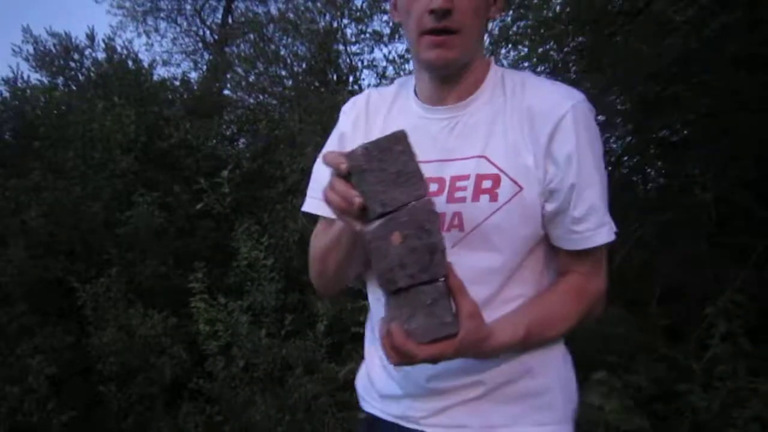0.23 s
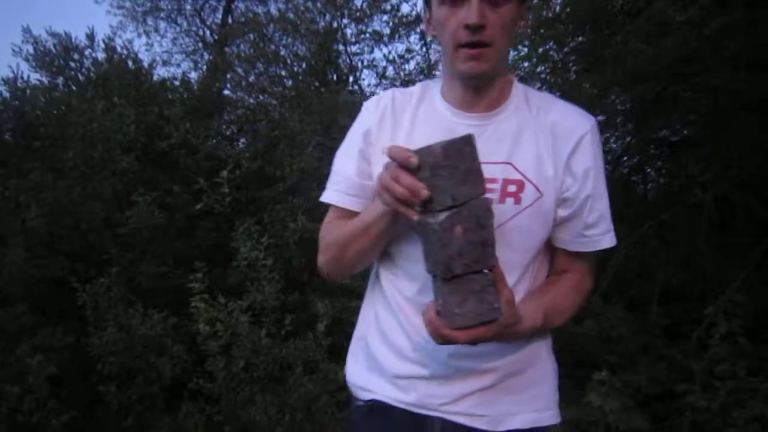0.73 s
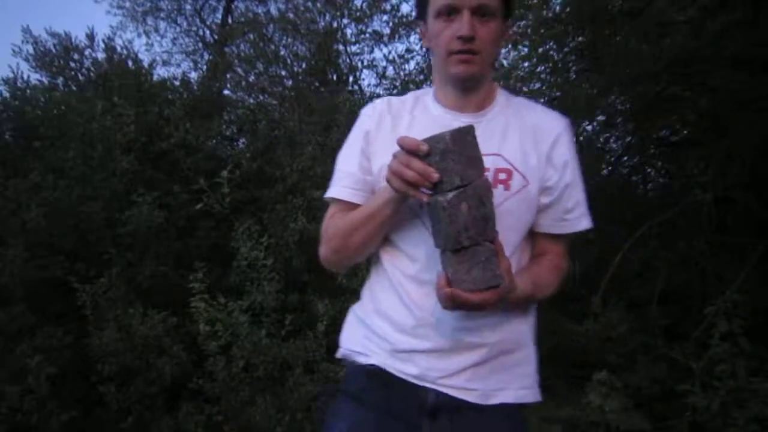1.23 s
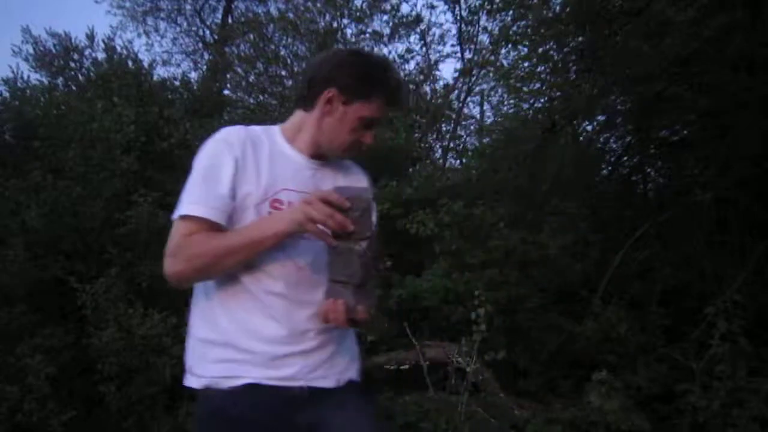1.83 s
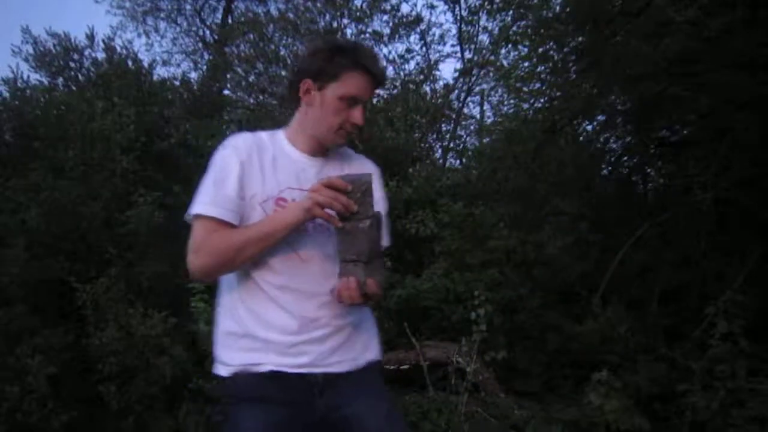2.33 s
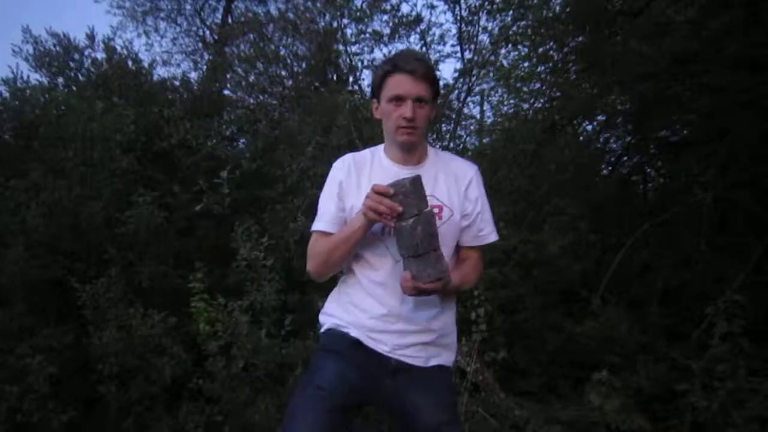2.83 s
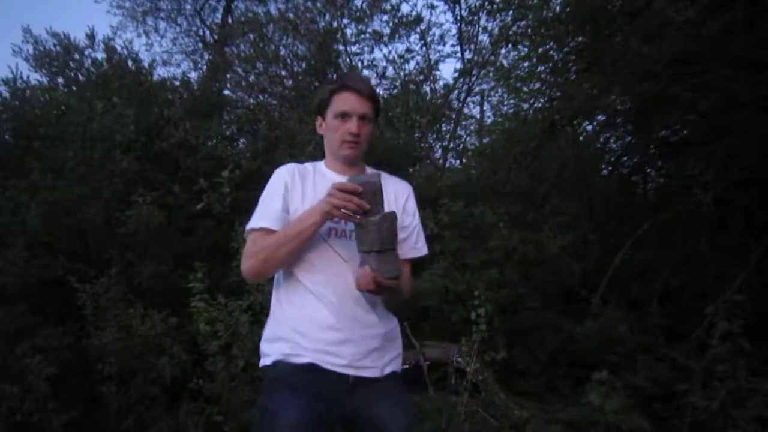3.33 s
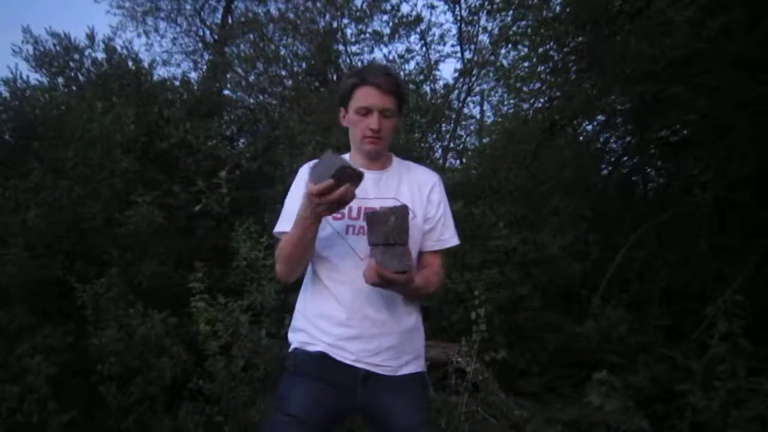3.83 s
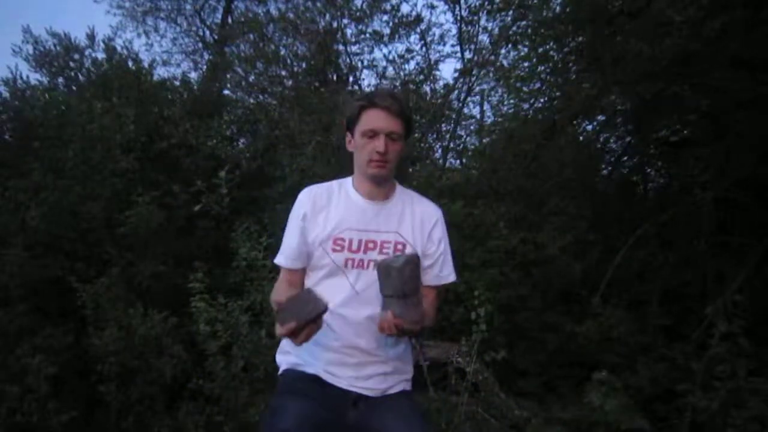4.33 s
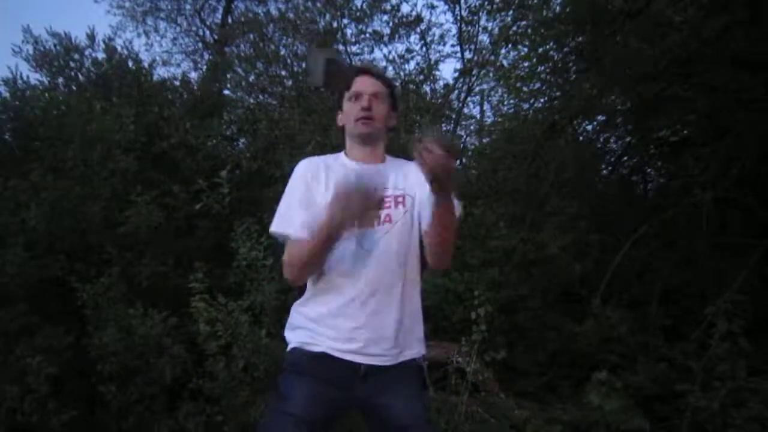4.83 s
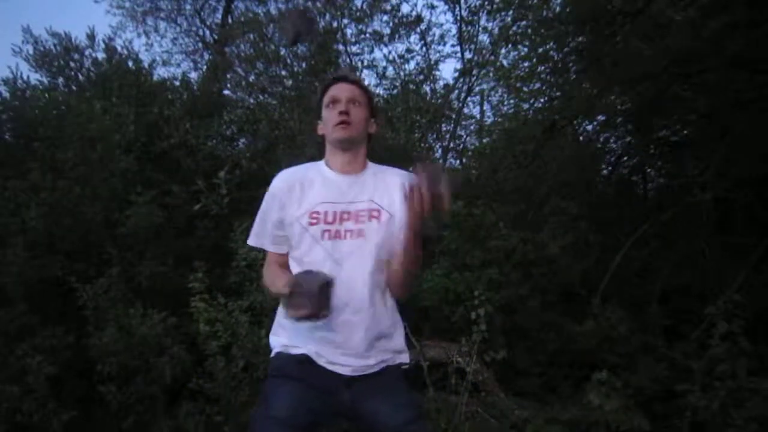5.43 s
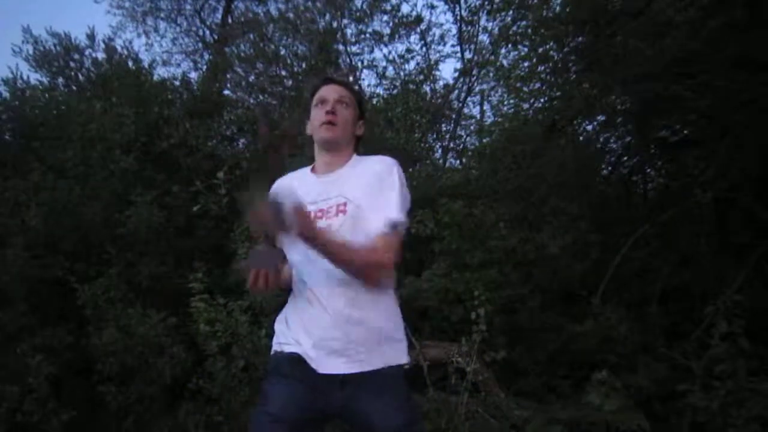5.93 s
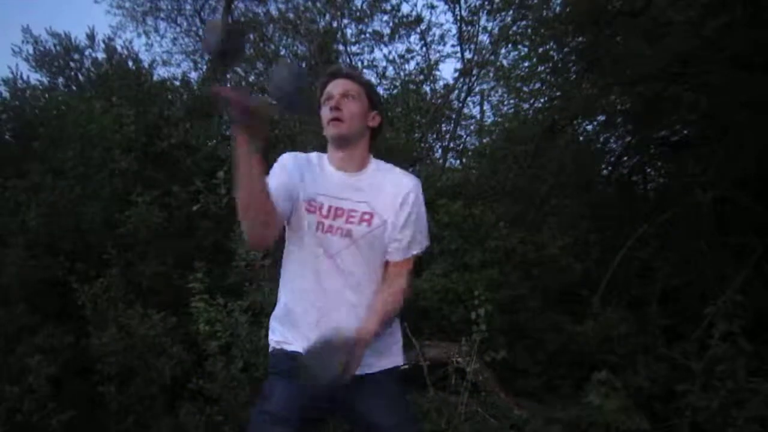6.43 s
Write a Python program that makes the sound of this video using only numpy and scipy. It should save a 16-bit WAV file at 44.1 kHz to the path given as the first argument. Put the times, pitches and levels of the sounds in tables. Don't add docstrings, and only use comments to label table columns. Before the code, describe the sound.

A dusk thicket with low, steady far-traffic rumble, faint engine swells and soft air hiss, heard through a small microphone with restrained treble. Close leaves rustle and stones tick irregularly, busiest from 0 to 3.4 s, with sharp clicks near 1.36, 1.56 and 3.08. A nightingale gives thin dipping calls with quick flicks at 0.2, 0.8 and 1.45, and pulsing clear whistles at 0.43 and 1.06. Falling swoops at 1.7 and 2.4 each lead to a rising note and two double clacks. A low pipe climbs at 3.2. Seven bright pairs of falling chirps repeat from 3.5 to 5.0, most followed by a faint murmur; a distant whistle hides at 3.7. A short rising buzz at 5.06 launches fifteen crisp rattle strokes, 5.16 to 6.43, with a soft thump at 5.22. A longer falling chirp at 6.52, a low pipe and small ticks finish. Trees add diffuse echoes.

```python
import sys
import numpy as np
from scipy import signal
from scipy.fft import rfft, irfft
from scipy.io import wavfile
from scipy.ndimage import uniform_filter1d, map_coordinates

SR = 44100
rng = np.random.default_rng(int(sys.argv[2]) if len(sys.argv) > 2 else 0)


def to_linear_factor(level_db):
    exponent = np.asarray(level_db, float) / 20
    return 10 ** exponent


def dump_mix(stems):
    frames = np.atleast_2d(stems).T
    limited = np.clip(frames, -1, 1)
    pcm = np.round(limited * 32767).astype(np.int16)
    wavfile.write(sys.argv[1], SR, pcm)


N = 295470


def rms_one(x):
    return x / np.sqrt(np.mean(x ** 2) + 1e-20)


def at_hz(points, hz):
    table_hz, table_db = np.transpose(points)
    return np.interp(np.log(hz), np.log(table_hz), table_db)


def drift(rate_hz):
    r = np.exp(-2 * np.pi * rate_hz / SR)
    settled = signal.lfilter([1], [1, -2 * r, r * r], rng.standard_normal(N + SR))[SR:]
    return rms_one(settled)


def coloured(x, spectrum):
    hz = np.maximum(np.arange(N // 2 + 1) * SR / N, 1)
    return rms_one(irfft(rfft(x) * to_linear_factor(at_hz(spectrum, hz)), N))


def resonance(x, hz, width_hz):
    r = np.exp(-np.pi * width_hz / SR)
    top = np.array([1, 0, -1]) * (1 - r * r) / 2
    return signal.lfilter(top, [1, -2 * r * np.cos(2 * np.pi * hz / SR), r * r], x)


def resonance_twice(x, hz, width_hz):
    return resonance(resonance(x, hz, width_hz), hz, width_hz)


# frequency in Hz, level in dB per Hz.
AIR_SPECTRUM = [(20, -25), (32, -4.5), (45, 2), (105, -3), (170, -9), (900, -12), (1900, -27.5),
                (4250, -35), (7000, -38.5), (9000, -48), (10500, -44), (13000, -47.5), (16000, -48.5)]
# pitch in Hz, width in Hz, level in dB, loudest at in seconds, half length in seconds.
ENGINE_DRONES = [
    (47, 10, -48, 3.3, 9.0),
    (105, 14, -50, 2.3, .5),
    (112, 12, -50, 4.2, .3),
    (122, 14, -52, 5.6, .8),
    (243, 8, -55, 5.65, .2),
]


def far_traffic():
    air_db = -40.5 + 0.4 * drift(1.5)
    out = to_linear_factor(air_db) * coloured(rng.standard_normal(N), AIR_SPECTRUM)
    t = np.arange(N) / SR
    for hz, width_hz, db, loudest_s, half_s in ENGINE_DRONES:
        swell = to_linear_factor(db) * np.exp(-((t - loudest_s) / half_s) ** 2)
        out += swell * rms_one(resonance_twice(rng.standard_normal(N), hz, width_hz))
    return out


# start in seconds, peak in dB, brightness in dB.
TICK_EVENTS = [(0.036, -34.5, -5), (0.554, -33, -9), (0.7369, -32, 0.5), (1.3364, -42, -10.5),
               (1.357, -24.5, -6), (1.4266, -29, -10.5), (1.5644, -19, -19), (1.653, -42, -8),
               (1.6906, -27, -8), (2.439, -32, -18), (2.6152, -43, 0.1), (3.0755, -40, -30),
               (3.082, -17, 1.5), (3.1155, -26, -20), (3.2445, -26, -28), (3.251, -39, -9),
               (4.276, -40, -22), (4.2923, -25.5, -9), (4.313, -30, -22), (4.3845, -36, 2),
               (5.432, -30, -6), (6.575, -44, -30), (6.617, -37, -13), (6.668, -30, -18), (6.688, -37, -12)]


def ticks():
    out, t = np.zeros(N), np.arange(300) / SR
    bright = signal.butter(2, [8500, 15500], "band", fs=SR, output="sos")
    dull = signal.butter(2, [350, 7400], "band", fs=SR, output="sos")
    for s, low_db, bright_db in TICK_EVENTS:
        snap = rng.standard_normal(300) * np.exp(-t / 0.0008)
        for db, band in [(low_db + bright_db - 3, bright), (low_db + 2.5, dull)]:
            part = signal.sosfilt(band, snap)
            out[round(s * SR):][:300] += to_linear_factor(db) * part / np.abs(part).max()
    return out


# frequency in Hz, level in dB per Hz.
LEAF_SPECTRUM = [(880, -54), (1500, -15), (1810, -14.5), (2450, -17), (6020, -17.5), (7960, -30),
                 (13300, -37), (16400, -46)]
# centre in seconds, half length in seconds, level in dB, brightness in dB.
RUSTLE_SWELLS = [(0.055, .06, -51, -22), (0.143, 0.022, -47.5, -24), (0.493, 0.12, -59, 0),
                 (0.545, 0.037, -45.5, -19), (0.907, 0.093, -58, -3.5), (1.348, 0.029, -44, -4),
                 (1.433, 0.089, -54, -3.5), (1.587, 0.041, -65, 9), (1.65, 0.045, -52, -13),
                 (2.634, 0.32, -54, -10.5), (3.03, 0.043, -48.5, -8), (3.103, 0.028, -45, -3.5),
                 (3.235, 0.073, -55, -12), (3.388, 0.029, -43.5, -7), (3.716, 0.081, -56, -27),
                 (4.32, 0.015, -55, -9), (6.655, 0.072, -64, -24)]


def undergrowth():
    grains_per_s, unevenness_db, split_hz = 12000, 3.2, 7880
    sizes = to_linear_factor(unevenness_db * np.minimum(rng.exponential(1, N), 5)) * rng.choice([-1, 1], N)
    grains = coloured(sizes * (rng.random(N) < grains_per_s / SR), LEAF_SPECTRUM)
    t, out = np.arange(N) / SR, np.zeros(N)
    for kind in ["high", "low"]:
        split = signal.butter(4, split_hz, kind, fs=SR, output="sos")
        band = rms_one(signal.sosfilt(split, grains))
        power = np.zeros(N)
        for s, half_s, db, bright_db in RUSTLE_SWELLS:
            band_db = db + bright_db * (kind == "high")
            power += to_linear_factor(band_db) ** 2 * np.exp(-((t - s) / half_s) ** 2)
        out += np.sqrt(power) * band
    return to_linear_factor(2.0 * drift(32)) * out


# multiple of the pitch, level in dB.
PURE_OVERTONES = [(2, -36), (3, -36), (4, -54)]
# frequency in Hz, gain in dB.
NARROW_BEAK = [(2500, 12), (6000, 0.5), (8500, -5.5), (9100, -6), (10600, 4), (12500, -1.5), (16000, -29)]


def narrow_beak(turn, pitch_hz, effort_db, overtone_db):
    growth, full_effort_db = 0.32, -37.5
    push_db = overtone_db + growth * (effort_db - full_effort_db)
    tone = np.sin(turn)
    for k, db in PURE_OVERTONES:
        gain = to_linear_factor(db + push_db + at_hz(NARROW_BEAK, k * pitch_hz))
        tone = tone + gain * np.sin(k * turn) * (k * pitch_hz < 18000)
    return tone


# frequency in Hz, gain in dB.
WIDE_THROAT = [(1200, -63), (2400, -4), (4000, -1), (6300, 9), (7600, -1), (10500, -22), (12500, -6),
               (16000, -35)]


def wide_beak(turn, pitch_hz):
    tone = 0
    for k in range(1, 19):
        gain = to_linear_factor(at_hz(WIDE_THROAT, k * pitch_hz)) * (k * pitch_hz < 18000)
        tone = tone + gain * np.sin(k * turn + k * k)
    return tone


def add_note(out, rows, overtone_db, wobble):
    s, hz, level_db = np.transpose(rows)
    n = np.arange(round(s[0] * SR), min(round(s[-1] * SR), N))
    t = n / SR
    rounding = min(len(n) // 14, round(0.0045 * SR))
    pitch_hz = uniform_filter1d(np.interp(t, s, hz), size=rounding, mode="nearest") * (1 + wobble[n])
    turn = 2 * np.pi * np.cumsum(pitch_hz) / SR
    effort_db = np.interp(t, s, level_db)
    if overtone_db is None:
        jitter_rad = 0.16 * drift(300)[n]
        tone = wide_beak(turn + jitter_rad, pitch_hz)
    else:
        tone = narrow_beak(turn, pitch_hz, effort_db, overtone_db)
    edge = np.clip(np.minimum(t - t[0], t[-1] - t) / 0.0015, 0, 1)
    out[n] += np.sqrt(2) * to_linear_factor(effort_db) * edge * tone


def sing(out, shape, times, overtone_db, wobble):
    for s, db, ratio in times:
        rows = np.array(shape) * [1 / 1000, ratio, 1] + [s, 0, db]
        add_note(out, rows, overtone_db, wobble)


def breath(ms, db, attack_ms, release_ms, sag_db):
    end_ms, held_db = ms[-1], db - sag_db
    return np.interp(ms, [0, attack_ms, end_ms - release_ms, end_ms], [db - 17, db, held_db, held_db - 12.5])


def glide(length_ms, from_hz, to_hz, **level):
    ms = np.linspace(0, length_ms, 40)
    return np.transpose([ms, np.interp(ms, [0, length_ms], [from_hz, to_hz]), breath(ms, **level)])


# time in ms, pitch in Hz, level in dB rms.
SEEP_SHAPE = [(0, 7200, -46), (8, 6950, -31.5), (19.5, 6600, -24), (31.4, 6850, -26), (36.5, 7500, -32.5),
              (46, 8060, -41.5)]
# start in seconds, seep change in dB, flick change in dB, pitch ratio.
HIGH_CALLS = [
    (0.177, -10.5, -10.5, 1.04),
    (.810, 0, 1.5, 1.03),
    (1.453, 2, 8.5, 1.0),
]


def high_calls(out, wobble):
    flick = glide(7.3, 7440, 4230, db=-22.5, attack_ms=4, release_ms=3.5, sag_db=4.5)
    for s, seep_db, flick_db, ratio in HIGH_CALLS:
        sing(out, SEEP_SHAPE, [(s, seep_db, ratio)], -3, wobble)
        sing(out, flick, [(s + 0.0499, flick_db, ratio)], 3, wobble)


# final pitch in Hz, starts lower by Hz, climb time in seconds, creep in Hz per s.
WHISTLE_PITCHES = [
    (4495, 730, .036, 30),
    (4190, 700, .024, 560),
]
# time in seconds, level in dB rms.
WHISTLE_BREATHS = [
    [(0.425, -43), (0.445, -26.5), (0.491, -22.5), (0.535, -39.5), (0.587, -19), (0.634, -19.5),
     (0.648, -42)],
    [(1.058, -38), (1.072, -27.5), (1.108, -20), (1.166, -37.5), (1.258, -17), (1.284, -18), (1.302, -60)],
]


def whistles(out, wobble):
    for (final_hz, lower_hz, climb_s, creep), swells in zip(WHISTLE_PITCHES, WHISTLE_BREATHS):
        s, db = np.transpose(swells)
        t = np.linspace(0, s[-1] - s[0], 120)
        droop_hz = 90 * np.exp((t - t[-1]) / 0.008)
        hz = final_hz - lower_hz * np.exp(-t / climb_s) + creep * t - droop_hz
        rows = np.transpose([s[0] + t, hz, np.interp(s[0] + t, s, db)])
        add_note(out, rows, -4, wobble)


# time in ms, pitch in Hz, level in dB rms.
SWOOP_SHAPE = [(0, 2725, -44.5), (13.8, 2600, -19), (41.9, 1975, -19.5), (64.6, 1890, -30)]
# start in seconds, change in dB, pitch ratio.
SWOOP_TIMES = [
    (1.690, 0, 0.99),
    (2.378, 0.83, 1.0),
]


def swoops(out, wobble):
    sing(out, SWOOP_SHAPE, SWOOP_TIMES, -6.5, wobble)


# start in seconds, change in dB, pitch ratio.
RISE_TIMES = [
    (1.867, 0.0091, 0.98),
    (2.572, 0.012, 0.98),
]


def rises(out, wobble):
    start_hz, creep_hz_per_ms, race_hz, race_ms = 2381, 3.5, 848, 30
    break_ms, jump_hz, top_hz_per_ms = 163, 321, 17
    ms = np.linspace(0, 189.4, 120)
    below = np.minimum(ms, break_ms)
    hz = start_hz + creep_hz_per_ms * below + race_hz * np.exp((below - break_ms) / race_ms)
    hz = hz + jump_hz * (ms > break_ms) + top_hz_per_ms * (ms - below)
    dip_db = 2.5 * np.exp(-((ms - break_ms) / 21) ** 2)
    level_db = breath(ms, db=-17.5, attack_ms=44.5, release_ms=12.5, sag_db=0.3) - dip_db
    sing(out, np.transpose([ms, hz, level_db]), RISE_TIMES, -4, wobble)


# start in seconds, peak in dB, ring in Hz.
CLACK_EVENTS = [
    (2.189, -18, 5500),
    (2.1949, -20, 4060),
    (2.216, -21.5, 4720),
    (2.2224, -13.5, 4900),
    (2.9247, -21.5, 4450),
    (2.93, -22, 5470),
    (2.9516, -17, 5600),
    (2.957, -16, 4600),
]


def clacks():
    out, t = np.zeros(N), np.arange(400) / SR
    for s, db, hz in CLACK_EVENTS:
        burst = rng.standard_normal(400) * np.exp(-t / 0.0011)
        ring = resonance_twice(burst, hz, 2200) + to_linear_factor(-21) * resonance_twice(burst, 10800, 2500)
        out[round(s * SR):][:400] += to_linear_factor(db - 1.5) * ring / np.abs(ring).max()
    return out


# start in seconds, change in dB, pitch ratio.
PEEP_TIMES = [(3.125, 0, 1.0)]


def peep(out, wobble):
    shape = glide(35, 2780, 2900, db=-60, attack_ms=10, release_ms=15, sag_db=1.5)
    sing(out, shape, PEEP_TIMES, 0, wobble)


# time in seconds, pitch in Hz, level in dB rms.
PIPE_NOTES = [
    [(3.165, 1220, -38.5), (3.187, 1365, -42), (3.207, 1056, -53), (3.225, 1110, -41)],
    [(3.226, 1068, -48), (3.252, 1730, -26.5), (3.264, 1840, -24), (3.288, 1840, -22), (3.301, 1850, -27),
     (3.306, 1760, -32), (3.311, 1800, -26), (3.317, 1800, -35)],
    [(6.635, 1550, -49), (6.645, 1647, -37), (6.661, 1542, -30.5), (6.7, 1470, -32)],
]


def pipes(out, wobble):
    for rows in PIPE_NOTES:
        add_note(out, rows, -4, wobble)


# frequency in Hz, gain in dB.
WINDPIPE_GAIN = [(1150, -17.5), (1480, -21.5), (1820, -10), (2250, -5.5), (3080, 0), (3620, -3.5),
                 (4280, -4.5)]


def chirp(length_ms, fall_hz_per_ms, floor_hz, floor_drift_hz_per_ms, db):
    ms = np.linspace(0, length_ms, 60)
    falling_hz = 3704 + 560 * np.exp(-ms / 1.37) - fall_hz_per_ms * ms
    hz = np.maximum(falling_hz, floor_hz + floor_drift_hz_per_ms * ms)
    fade_db = 6.5 * np.clip(ms - length_ms + 2.8, 0, None) / 2.3
    return np.transpose([ms, hz, db + at_hz(WINDPIPE_GAIN, hz) - fade_db])


# time in ms, pitch in Hz, level in dB rms.
MURMUR_SHAPE = [(0, 1160, -51), (8, 1200, -41), (22, 1235, -38.5), (34, 1100, -54), (43.3, 1230, -49),
                (56, 1200, -64)]
# start in seconds, hook pitch ratio, murmur delay in seconds.
CHIRP_PAIRS = [
    (3.474, .98, .1),
    (3.724, 1.012, 0.098),
    (3.956, 1.01, .1),
    (4.1899, 1.01, 0.1),
    (4.4274, 1.01, 0.1),
    (4.6613, 1.02, 0.12),
    (4.901, 1.026, 0.05),
]


def chirp_pairs(out, wobble):
    hook = chirp(30, 81, 1691, 23, db=-14)
    fall = chirp(29.5, 88.5, 1385, 4, db=-13)
    for s, hook_ratio, _ in CHIRP_PAIRS:
        sing(out, hook, [(s, 0, hook_ratio)], 0, wobble)
        sing(out, fall, [(s + 0.0397, 0, 1)], 0, wobble)
    for s, _, after_s in CHIRP_PAIRS[:-1]:
        ratio = 1 + 0.021 * rng.standard_normal()
        sing(out, MURMUR_SHAPE, [(s + after_s, 0, ratio)], 0, wobble)


# start in seconds, change in dB, pitch ratio.
FAR_WHISTLE_TIMES = [(3.685, 0, 1.0)]


def far_whistle(out, wobble):
    shape = glide(240, 5190, 5130, db=-65, attack_ms=20, release_ms=120, sag_db=2.5)
    sing(out, shape, FAR_WHISTLE_TIMES, -20, wobble)


# start in seconds, change in dB, pitch ratio.
BUZZ_TIMES = [(5.062, 0.63, 0.99)]


def buzz(out, wobble):
    length_ms, start_hz, end_hz, bend = 59, 860, 2560, 1.4
    ms = np.linspace(0, length_ms, 40)
    hz = start_hz * (end_hz / start_hz) ** ((ms / length_ms) ** bend)
    level_db = breath(ms, db=-37, attack_ms=15, release_ms=4, sag_db=-5.5)
    sing(out, np.transpose([ms, hz, level_db]), BUZZ_TIMES, None, wobble)


# peak time in seconds, peak in dB.
RATTLE_STROKES = [(5.1589, -22.5), (5.2631, -21.5), (5.3533, -24), (5.4456, -26.5), (5.5426, -24.5),
                  (5.6347, -25), (5.725, -26.5), (5.8106, -25.5), (5.8964, -25.5), (5.9866, -25),
                  (6.0791, -24.5), (6.17, -23.5), (6.2588, -23.5), (6.346, -23), (6.4332, -26)]


def rattle(out, wobble):
    lead_s, gain_db, sag_per_s, scatter = 0.0016, 24.5, 0.024, 0.021
    high = glide(5.06, 8500, 5100, db=-22.5, attack_ms=2.8, release_ms=2.2, sag_db=-0.5)
    low = glide(4.87, 5300, 2630, db=-31.5, attack_ms=0.15, release_ms=0.5, sag_db=10)
    sum_hz, sum_db = low[:, 1] + high[:, 1], (low[:, 2] + high[:, 2]) / 2 - 14
    mixed = np.transpose([low[:, 0], sum_hz, sum_db])
    for s, db in RATTLE_STROKES:
        ratio = 1 - sag_per_s * (s - RATTLE_STROKES[0][0]) + scatter * rng.standard_normal()
        for shape, overtone_db in [(high, -4), (low, 6), (mixed, 0)]:
            sing(out, shape, [(s - lead_s, db + gain_db, ratio)], overtone_db, wobble)


def thud():
    s, db, hz = 5.2195, -19, 60
    after_s = np.maximum(np.arange(N) / SR - s, 0)
    return -to_linear_factor(db) * np.sin(2 * np.pi * hz * after_s) * np.exp(-after_s / 0.003)


# start in seconds, change in dB, pitch ratio.
LONG_CHIRP_TIMES = [(6.521, 0, 0.96)]


def long_chirp(out, wobble):
    sing(out, chirp(38.5, 83.5, 1050, 11, db=-17), LONG_CHIRP_TIMES, 0, wobble)


def nightingale():
    out, wobble = np.zeros(N), 0.0018 * drift(46)
    for phrase in [high_calls, whistles, swoops, rises, peep, pipes, chirp_pairs, far_whistle, buzz,
                   rattle, long_chirp]:
        phrase(out, wobble)
    return out + clacks()


# 60 dB decay time in seconds, level in dB, air loss above Hz.
SCATTERERS = [
    (.03, -19.5, 15000),
    (.16, -8.5, 12000),
    (0.502, -14, 5100),
    (1.0, -18.5, 3320),
]


def thicket(x):
    t, echo = np.arange(SR) / SR, np.zeros(SR)
    for t60_s, db, loss_hz in SCATTERERS:
        air_loss = signal.butter(2, loss_hz, fs=SR, output="sos")
        dulled = signal.sosfilt(air_loss, rng.standard_normal(SR))
        echo += to_linear_factor(db - 60 * t / t60_s) * dulled / np.sqrt(t60_s * SR / np.log(1e6))
    onset = np.clip((t - 0.001) / 0.0018, 0, 1)
    wet = signal.fftconvolve(x, echo * onset)[:N]
    sway_s = 6e-5 * drift(5.8)
    return map_coordinates(wet, [np.arange(N) + SR * sway_s], order=3, mode="nearest")


def scene():
    bird, near = nightingale(), ticks() + thud()
    foliage = signal.butter(1, 6600, fs=SR, output="sos")
    straight = 0.94 * signal.sosfilt(foliage, bird)
    echoes = thicket(bird + 0.3 * near)
    return (straight + near + echoes + undergrowth() + far_traffic())[None]


def top_cut(x):
    return signal.sosfilt(signal.butter(12, 16510, fs=SR, output="sos"), x)


def record(dry):
    notch_hz, notch_width_hz, notch_leak = 7880, 1370, 0.23
    x = signal.sosfilt(signal.cheby2(16, 50, 16480, fs=SR, output="sos"), dry)
    for _ in range(2):
        x = x - (1 - notch_leak) * resonance(x, notch_hz, notch_width_hz)
    return top_cut(x)


dry = scene()
out = record(dry)
dump_mix(out)
```